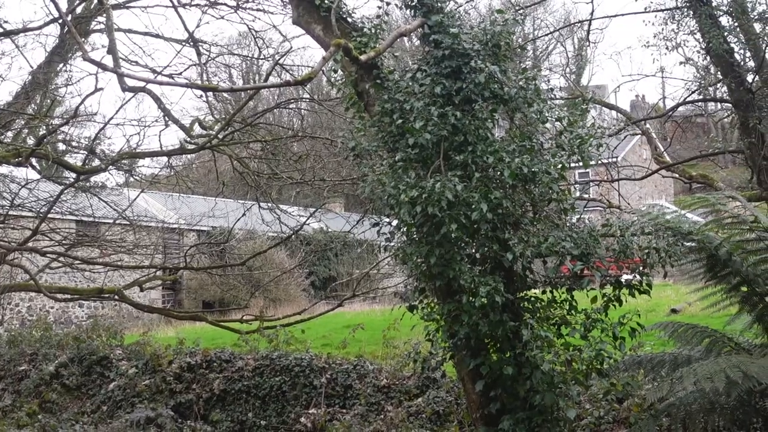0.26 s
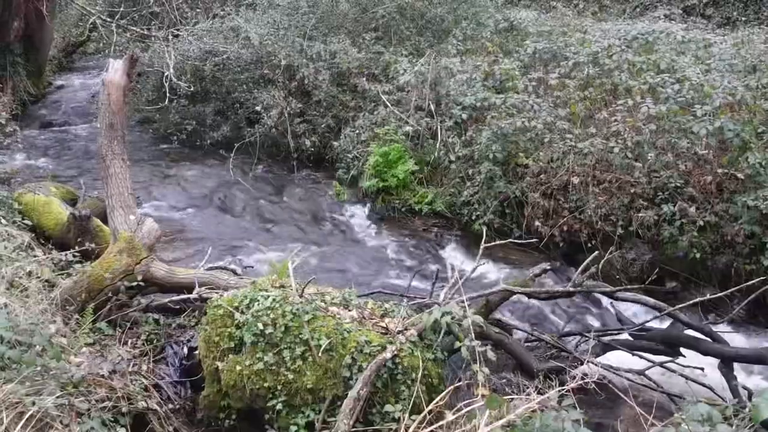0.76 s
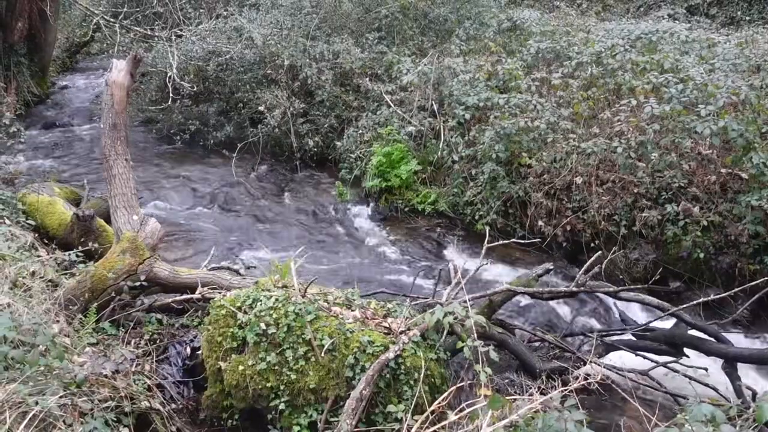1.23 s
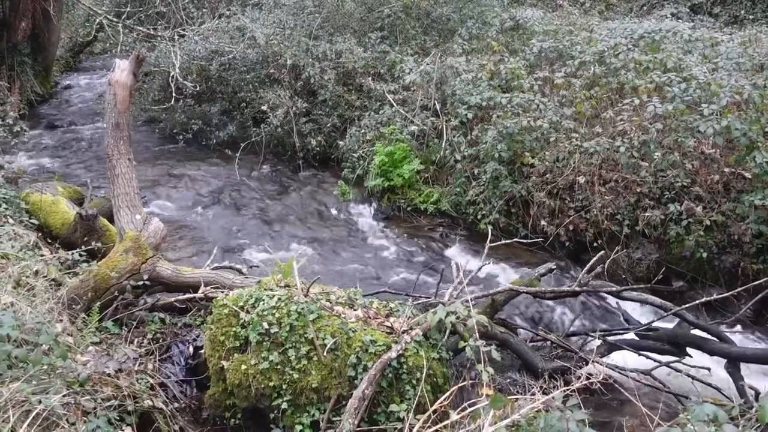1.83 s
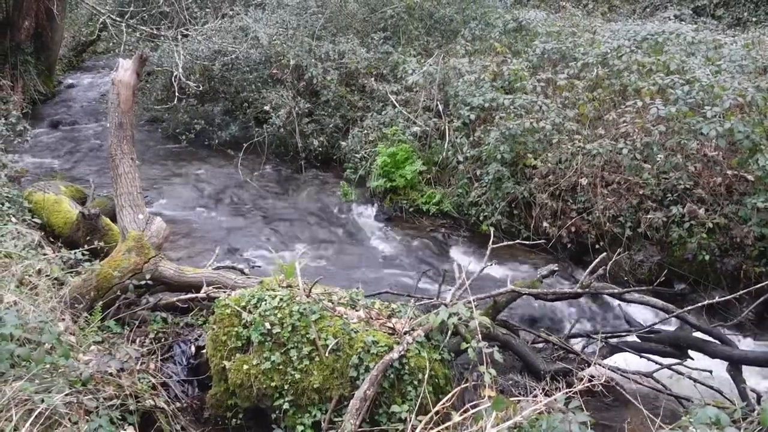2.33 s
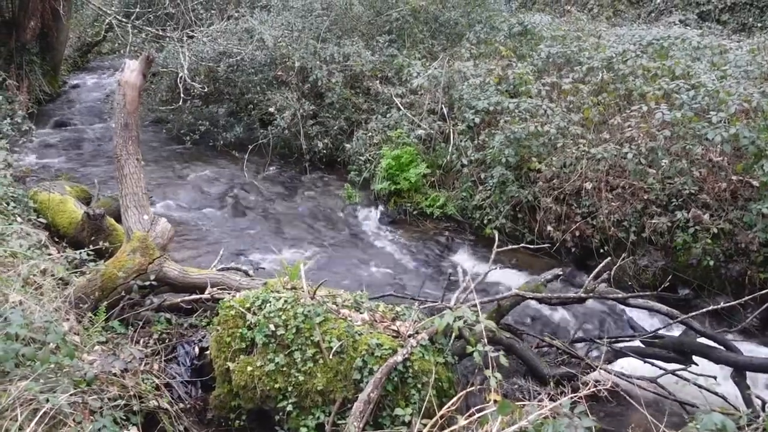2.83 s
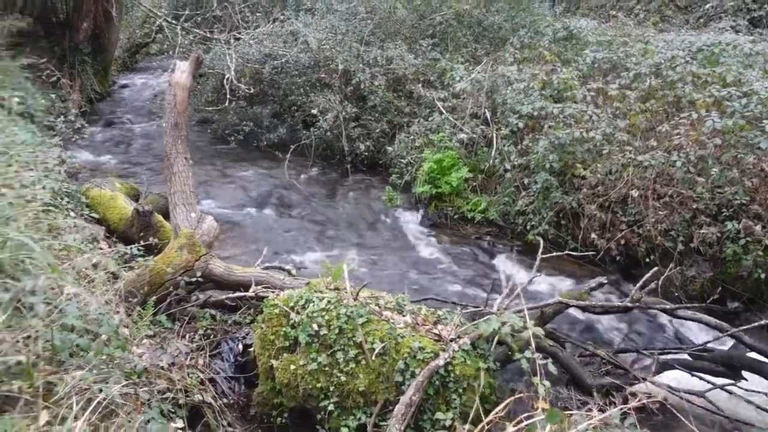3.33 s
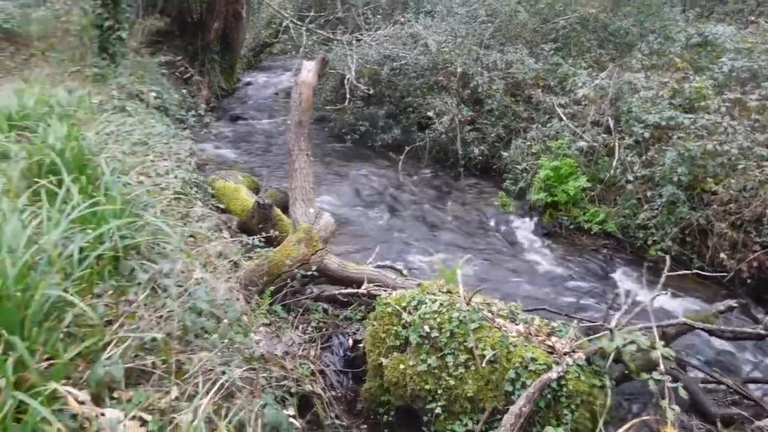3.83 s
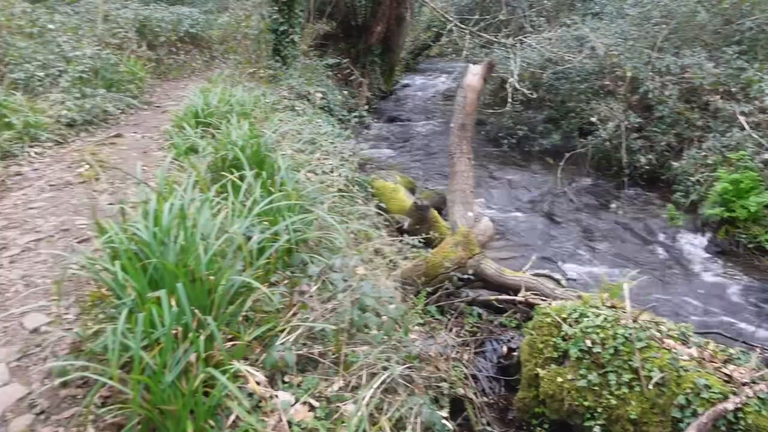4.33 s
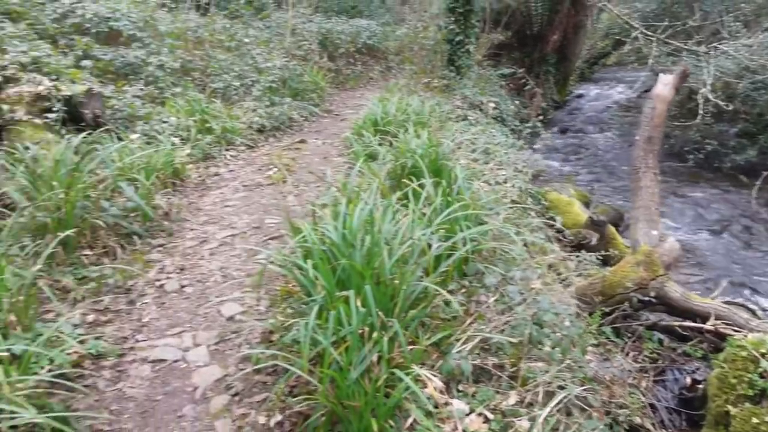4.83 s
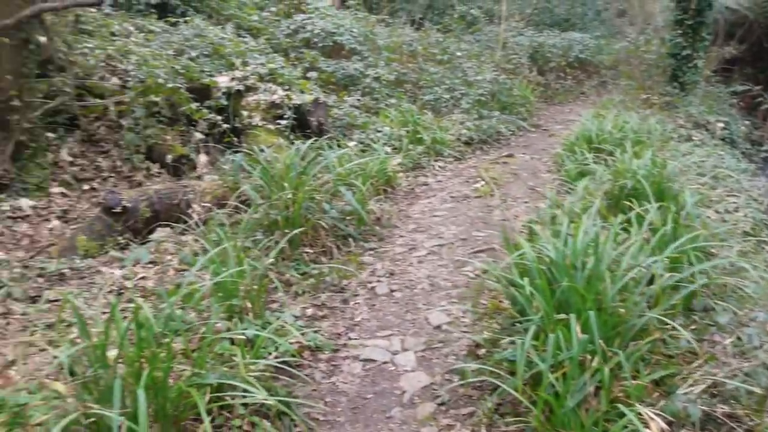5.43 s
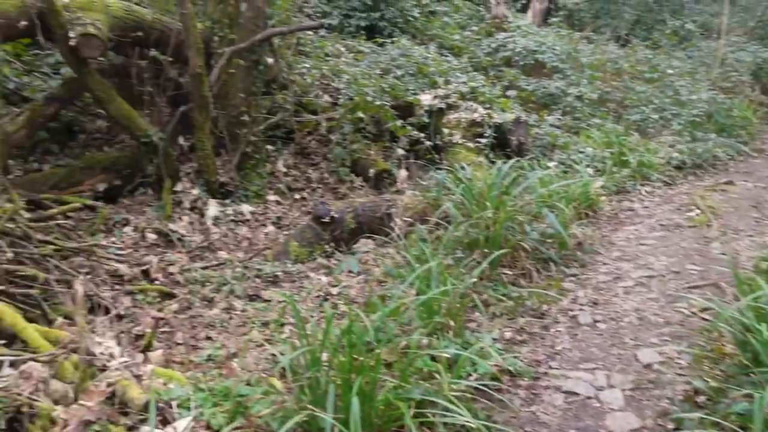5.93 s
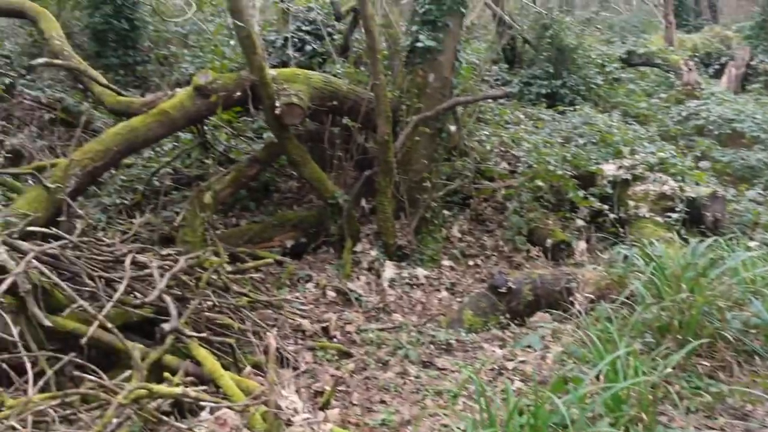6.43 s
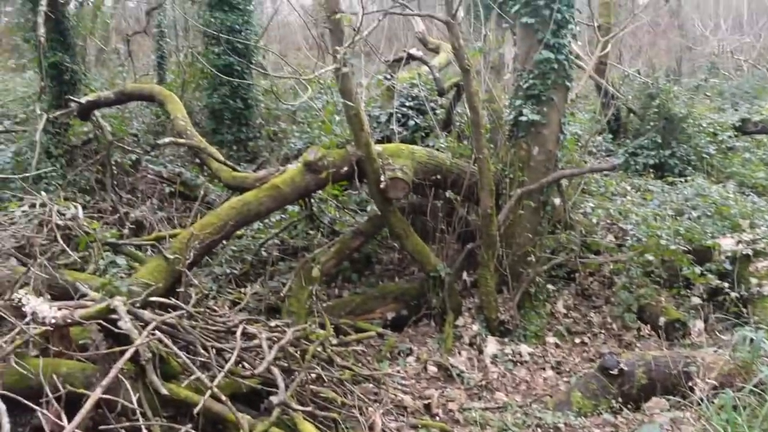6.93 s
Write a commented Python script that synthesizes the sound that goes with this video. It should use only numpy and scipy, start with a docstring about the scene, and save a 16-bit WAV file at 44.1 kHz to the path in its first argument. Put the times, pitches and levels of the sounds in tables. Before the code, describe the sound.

A fast shallow stream rushes over rocks in a wood, a dense hiss with mid-low gurgling and babbling. It starts slightly softer and duller, blinks nearly silent at a cut around half a second, then returns closer and brighter. Small round glugs and droplet ticks stand out. Handheld stereo leaning right; as the microphone turns left, the water grows duller and quieter.

```python
"""A shallow, fast stream over rocks in a wood, heard by a hand-held pair of microphone ports.
First it is heard from a lawn; at 0.53 s a cut with a short fade leads to a pose facing the water.
From 3.13 s the ports turn left, until the stream lies behind the right shoulder.
The rush is bubble swarms in patchy noise, coloured by pose; damped sines make near glugs and droplets.
"""
import sys
import numpy as np
from scipy import signal
from scipy.fft import rfft, irfft, next_fast_len
from scipy.io import wavfile
from scipy.ndimage import uniform_filter1d, map_coordinates

SR = 44100
rng = np.random.default_rng(int(sys.argv[2]) if len(sys.argv) > 2 else 0)


def master(y):
    """Save y as 16-bit WAV."""
    cut = np.clip(np.atleast_2d(y).T, -1, 1)
    pcm = np.round(cut * 32767)  # scale
    wavfile.write(sys.argv[1], SR, pcm.astype(np.int16))


N = 316197
TOP_HZ = 15700  # band limit
FRAME = 2048  # samples
EDIT_S = 0.532  # cut from the lawn to the water


def water():
    """Churn, gurgle, ringing trickles, fizz and sparse spatter surge together over the rocks."""
    gurgle = swarm(count=2500, hz=799.8, spread=0.605, cycles=5.16, scatter_db=7.5, size=1400)
    trickle = swarm(count=2500, hz=3210, spread=0.6, cycles=11, scatter_db=16, size=900)
    fizz = swarm(count=12000, hz=6860, spread=0.507, cycles=2.6, scatter_db=17, size=160)
    spatter = swarm(count=500, hz=6000, spread=0.546, cycles=1.6, scatter_db=14, size=120)
    mix = churn(patchy_db=0.67) + gurgle * amp(-21) + trickle * amp(-19)
    mix = mix + fizz * amp(-11) + spatter * amp(-24)
    surge_db = 0.37 * wobble(9) + 0.26 * wobble(25)
    return amp(surge_db) * mix


def churn(patchy_db):
    """Countless far bubbles merge into noise whose loudness comes in patches of time and pitch."""
    _, _, z = signal.stft(rng.standard_normal(N), nperseg=256)
    field = uniform_filter1d(rng.standard_normal(z.shape), size=8, axis=0)
    field = uniform_filter1d(field, size=10, axis=1)
    return signal.istft(z * amp(patchy_db * field / field.std()), nperseg=256)[1][:N]


def swarm(count, hz, spread, cycles, scatter_db, size):
    """Random bubbles: log-normal pitch, levels spread evenly over a range of dB, unit RMS in all."""
    place, g = rng.random((count, 2)), rng.standard_normal(count)
    pitch_hz = np.clip(hz * np.exp(spread * g), 150, TOP_HZ)
    start_s = place[:, 0] * N / SR
    x = bubbles(start_s, amp(-scatter_db * place[:, 1]), pitch_hz, cycles, 0.059, size)
    return x / x.std()


def bubbles(start_s, gain, hz, cycles, rise, size):
    """Damped sines with a soft start; the pitch rises as each bubble nears the surface."""
    k = np.arange(size)
    turns = k / SR * hz[:, None]
    age = turns / cycles
    envelope = age * np.exp(1 - age) * np.exp(-(k / size * 2) ** 4)
    ring = envelope * np.sin(2 * np.pi * turns * (1 + rise * age / 2))
    at = np.round(start_s * SR).astype(int)[:, None] + k
    return np.bincount(at.ravel(), (gain[:, None] * ring).ravel(), N + size)[:N]


# single bubbles that stand out: (envelope peak time [s], nominal peak level [dB], pitch [Hz])
GLUG_EVENTS = [(.05, -23, 760), (.108, -21, 1000), (.128, -24, 1550), (.162, -25, 1500), (.222, -24, 602),
               (.254, -33, 312), (.318, -24, 1500), (.388, -23, 1050), (.568, -31, 2970), (.59, -24, 839),
               (.794, -30, 2930), (.808, -21, 820), (.959, -20, 807), (.963, -31, 3620), (1.222, -32, 4070),
               (1.435, -25, 1420), (1.455, -21, 830), (1.501, -29, 3510), (1.512, -28, 2600),
               (1.515, -32, 4240), (1.522, -28, 470), (1.527, -19, 650), (1.678, -36, 279),
               (1.756, -30, 3680), (1.766, -18, 839), (1.898, -21, 800), (2.008, -24, 3100),
               (2.034, -22, 775), (2.594, -29, 2520), (2.686, -23, 710), (2.857, -27, 1700),
               (2.888, -30, 3660), (2.929, -21, 710), (2.968, -29, 2390), (3.156, -29, 3270),
               (3.249, -25, 1750), (3.257, -33, 366), (3.274, -23, 860), (3.29, -25, 1400),
               (3.305, -26, 1550), (3.408, -27, 1790), (3.507, -23, 710), (3.557, -21, 699),
               (3.62, -22, 760), (3.668, -21, 800), (3.69, -21, 760), (3.708, -22, 656), (3.724, -21, 690),
               (3.869, -30, 3790), (3.885, -26, 1900), (3.909, -24, 1920), (3.952, -25, 1950),
               (4.104, -24, 1700), (4.12, -21, 775), (4.178, -23, 1540), (4.217, -22, 915),
               (4.296, -35, 290), (4.425, -25, 1750), (4.44, -26, 1800), (4.497, -32, 3660),
               (4.515, -23, 1500), (4.538, -24, 1100), (4.719, -24, 1700), (4.877, -24, 839),
               (4.885, -27, 3550), (4.918, -28, 2300), (4.943, -26, 600), (5.148, -29, 2390),
               (5.154, -24, 860), (5.516, -33, 4370), (5.574, -23, 925), (5.596, -29, 325),
               (5.606, -33, 4760), (6.036, -25, 1140), (6.084, -25, 880), (6.132, -24, 1335),
               (6.143, -35, 366), (6.194, -26, 670), (6.214, -25, 1440), (6.249, -27, 600),
               (6.275, -27, 600), (6.292, -24, 1250), (6.567, -25, 900), (6.612, -31, 2300),
               (6.646, -27, 2930), (6.734, -25, 839), (6.917, -34, 409), (6.936, -23, 882),
               (6.986, -27, 1065), (7.046, -29, 1184)]


def glugs():
    """Single near bubbles; the higher the pitch, the more cycles until the envelope peaks and decays."""
    peak_s, db, hz = np.transpose(GLUG_EVENTS)
    cycles = 3.8 * (hz / 700) ** 0.7
    return bubbles(peak_s - cycles / hz, amp(db), hz, cycles[:, None], rise=0.012, size=4000)


# near droplets: (time [s], nominal peak level of each bubble [dB], centre pitch [Hz], pitch spread [octaves])
DROPLET_EVENTS = [(.162, -30, 7000, 0.35), (.375, -39, 11000, .3), (.567, -31, 4500, .8),
                  (1.025, -30, 4200, 0.47), (1.142, -27, 7400, .35), (1.431, -30, 3300, 0.37),
                  (1.514, -25, 3600, 0.44), (1.536, -41, 10000, .3), (1.917, -30, 6940, 0.23),
                  (2.008, -30, 3300, .4), (3.152, -27, 3400, .4), (3.658, -32, 8500, .35),
                  (3.715, -35, 6300, .3), (3.898, -39, 10000, .3), (4.073, -30, 6300, .3),
                  (4.65, -32, 3600, 0.36), (4.7135, -27, 8200, 0.23), (4.9215, -33, 11800, .3),
                  (5.312, -44, 10000, .3), (5.445, -38, 6300, .3), (5.521, -45, 10000, .3),
                  (5.547, -45, 10000, .3), (5.826, -30, 4700, .6), (6.008, -28, 3600, .4),
                  (6.452, -46, 10000, .3), (6.477, -34, 3600, .4), (6.644, -33, 4200, 0.63),
                  (6.781, -34, 4700, 0.55), (6.871, -45, 10000, .3)]


def droplets():
    """Droplets and small splashes: each bursts into six tiny bubbles within 2.2 ms."""
    start_s, db, hz, octaves = np.repeat(DROPLET_EVENTS, 6, axis=0).T
    late_s = 0.0022 * rng.random(start_s.shape)
    detune = np.tile(np.linspace(-1, 1, 6), len(DROPLET_EVENTS))
    detune = detune + rng.uniform(-0.2, 0.2, start_s.shape)
    return bubbles(start_s + late_s, amp(db), hz * 2 ** (octaves * detune), cycles=3, rise=0.01, size=400)


# slow swells of the whole rush: (time [s], level [dB])
RUSH_SURGE = [(0, 2), (.3, 1.5), (.7, 0.1), (1.3, 0.44), (2, 0.56), (2.6, 0.5), (3.1, 0.3), (3.7, 0.4),
              (4.5, -0.5), (5, 0.5), (5.45, 0), (5.85, -0.5), (6.15, -0.5), (6.45, -1.7), (6.7, -1.5),
              (7.17, -1.3)]
# level of the low gurgling band at its centre: (time [s], level [dB])
GURGLE_LEVEL = [(0, -0.5), (.4, -2.5), (.7, -.8), (1.1, -0.9), (1.6, -0.2), (1.95, -0.5), (2.35, -.3),
                (2.6, -1), (2.9, -1.5), (3.3, -1), (3.5, -1), (3.7, 0), (3.9, -0.7), (4.3, 1), (4.6, -0.5),
                (4.9, 1.5), (5.4, 0), (5.8, 0.5), (6.2, 1), (6.6, 2.5), (7.17, 3)]
# level of the brighter babbling band at its centre: (time [s], level [dB])
BABBLE_LEVEL = [(0, 1.5), (.2, 1.5), (.45, 3), (.8, -1), (1.2, 1.5), (1.6, -0.5), (2, 1), (2.5, 1), (3, 0),
                (3.3, -0.5), (3.6, 0.5), (3.9, 0), (4.2, -0.5), (4.48, 1.2), (4.7, -1), (5, 0), (5.5, -0.5),
                (5.8, 0), (6.1, 0.5), (6.3, .8), (6.6, .5), (7.17, -0.5)]


def flow_swells(hz, t):
    """Gain as the whole rush, its gurgling band and its babbling band swell and ebb."""
    def band_db(rows, centre_hz, half_width_octaves):
        offset = np.log2(hz / centre_hz + 1e-9) / half_width_octaves
        return np.outer(np.exp(-offset ** 2), np.interp(t, *np.transpose(rows)))

    surge_db = np.interp(t, *np.transpose(RUSH_SURGE))
    return amp(surge_db + band_db(GURGLE_LEVEL, 725, 0.47) + band_db(BABBLE_LEVEL, 1530, 0.48))


# rush spectra at the right port, before treble tilt and level scaling: (frequency [Hz], relative density [dB])
LAWN_COLOUR = [(60, -51), (120, -44), (180, -29), (280, -14.5), (450, -13), (620, -5), (810, 0), (980, -1),
               (1190, -7.5), (1490, -7.5), (2200, -10), (2800, -13), (3500, -14), (4800, -18.5),
               (6500, -24), (9000, -31), (12000, -36.5), (15000, -48)]
FACING_COLOUR = [(60, -51), (120, -40.5), (180, -27), (280, -12), (450, -11.5), (560, -4), (700, 1.5),
                 (830, 2), (990, -0.5), (1150, -4.5), (1450, -3.5), (2200, -8), (3400, -8.5), (4800, -14),
                 (6500, -18.5), (9000, -22.5), (12000, -29), (15000, -39.5)]
HALF_TURN_COLOUR = [(60, -51), (120, -42), (180, -29.5), (280, -12), (450, -10), (560, -8), (700, -2.5),
                    (830, -0.5), (990, -2), (1150, -4.5), (1450, -3.5), (2200, -8), (3400, -9.5),
                    (4800, -15.5), (6500, -20.5), (9000, -24.5), (12000, -28.5), (15000, -37)]
AWAY_COLOUR = [(60, -51), (120, -48), (180, -32.5), (280, -17.5), (450, -9.5), (620, -8.5), (810, -6),
               (1150, -6.5), (1450, -7), (2200, -9.5), (3400, -12.5), (4800, -17.5), (6500, -24.5),
               (9000, -27), (12000, -29), (15000, -43)]
COLOUR_DEG = (0, 42, 78)  # facing, half turn, away
LAWN_DB, FACING_DB = -27.5, -25  # nominal levels before swells
BEHIND_DB, BEHIND_POWER = -3, 3  # level change at 120 degrees; power of the angle
SPRAY_DB_PER_OCTAVE, DULL_DB_PER_OCTAVE = -3.5, -9  # treble tilt after the cut
DULL_DEG, DULL_WIDTH_DEG = 45, 7  # angle where the treble dulls


def flow_colour(hz, t):
    """Spectrum and level of the rush by pose; it sinks and the treble grows duller during the turn."""
    dull = (1 + np.tanh((swing(t) - DULL_DEG) / DULL_WIDTH_DEG)) / 2
    tilt = SPRAY_DB_PER_OCTAVE + dull * (DULL_DB_PER_OCTAVE - SPRAY_DB_PER_OCTAVE)
    octaves_up = np.clip(np.log2(hz / 7500 + 1e-9), 0, 1.5)
    spray_db = np.outer(octaves_up, tilt * (t > EDIT_S))
    tables = (LAWN_COLOUR, FACING_COLOUR, HALF_TURN_COLOUR, AWAY_COLOUR)
    colour = amp(pose(tables, COLOUR_DEG, hz, t)[0] + spray_db)
    turned_db = FACING_DB + BEHIND_DB * (swing(t) / 120) ** BEHIND_POWER
    level = amp(np.where(t < EDIT_S, LAWN_DB, turned_db))
    return colour / np.sqrt(np.sum(colour ** 2, axis=0)) * level


# port pair by pose: (frequency [Hz], left minus right [dB], left-right likeness [0-1], left lead [rad])
LAWN_PAIR = [(40, -0.4, 0.96, 0), (180, -2.5, 0.97, -0.27), (900, -3.9, 0.95, -0.45),
             (2200, -2.4, 0.85, -0.43), (4800, -2.9, 0.71, 0), (6500, -1.2, 0.65, 0.17), (9000, 0, 0.89, 0),
             (15000, 0, 0.98, 0)]
FACING_PAIR = [(40, -0.4, 0.96, 0), (180, -2.1, 0.98, -0.25), (450, -4.6, 0.97, -0.22),
               (1150, -6.1, 0.96, -0.03), (3400, -5.3, 0.97, 0), (4800, -6.4, 0.84, -0.07),
               (6500, -5.5, 0.65, 0.35), (9000, -3.7, 0.62, 0.52), (12000, -1.1, 0.84, 0.15),
               (15000, 0, 1, 0)]
HALF_TURN_PAIR = [(40, -0.4, 0.96, 0), (450, -5, 0.97, -0.2), (800, -7.1, 0.97, -0.05),
                  (1300, -8.8, 0.92, 0.1), (2000, -8.1, 0.86, 0.35), (3200, -9.1, 0.8, 0.3),
                  (4700, -9.7, 0.63, 0.4), (6500, -8.9, 0.38, 0.6), (9000, -7, 0.48, 1.1),
                  (12000, -3.8, 0.35, 0.8), (15000, -0.2, 0.5, 1)]
SIDE_PAIR = [(40, -0.4, 0.96, 0), (450, -5.3, 0.98, -0.2), (800, -8.4, 0.95, 0.1), (1300, -8.7, 0.88, 0.35),
             (2000, -8.4, 0.84, 0.55), (3200, -11.8, 0.68, 0.55), (4700, -12.8, 0.38, 0.6),
             (6500, -9.2, 0.22, 2.6), (9000, -7.8, 0.24, 1.8), (12000, -3.6, 0.25, 2.9),
             (15000, -0.2, 0.2, 3)]
AWAY_PAIR = [(40, -0.4, 0.96, 0), (180, -2.9, 0.97, -0.17), (450, -5.3, 0.98, -0.18),
             (810, -9.6, 0.94, 0.05), (1150, -7.5, 0.85, 0.45), (2200, -7.4, 0.83, 0.55),
             (3400, -12.2, 0.52, 0.3), (4800, -10.2, 0.05, 2.57), (6500, -7.4, 0.32, 2.75),
             (9000, -9.1, 0.1, 2.41), (12000, -3.4, 0.4, 3.3), (15000, -0.2, 0.08, 3.2)]
PAIR_DEG = (0, 42, 70, 100)  # facing, half turn, side, away


def left_port(right, banks, hz, t):
    """The left port hears the right's sound shaded by the body, mixed with sound from the banks."""
    tables = (LAWN_PAIR, FACING_PAIR, HALF_TURN_PAIR, SIDE_PAIR, AWAY_PAIR)
    balance_db, alike, lead_rad = pose(tables, PAIR_DEG, hz, t)
    shared = alike * np.exp(1j * lead_rad) * right
    return amp(balance_db) * (shared + np.sqrt(1 - alike ** 2) * banks)


def pose(tables, degrees, hz, t):
    """Table columns for every Hz and moment: the lawn's, then those of the angles blended by the turn."""
    def read(rows):
        row_hz, *columns = np.transpose(rows)
        return np.array([np.interp(np.log(hz + 1), np.log(row_hz + 1), c) for c in columns])[..., None]

    lawn, *turned = map(read, tables)
    shares = [np.interp(swing(t), degrees, one) for one in np.eye(len(degrees))]
    blend = sum(table * share for table, share in zip(turned, shares))
    return np.where(t < EDIT_S, lawn, blend)


SWING_S, SWING_DEG_PER_S = 3.13, 27.4  # start and rate of the left turn


def swing(t):
    """Angle in degrees turned away from the stream."""
    return SWING_DEG_PER_S * np.clip(t - SWING_S, 0, None)


def amp(db):
    """Gain of a level in dB."""
    return 10 ** (np.asarray(db) / 20)


def wobble(rate):
    """A smooth random curve with rate knots a second."""
    knots = rng.standard_normal(int(N * rate / SR) + 4)
    return map_coordinates(knots, [np.arange(N) * rate / SR])


def frames(x):
    """Short-time spectra with their Hz and s axes."""
    return signal.stft(x, SR, nperseg=FRAME, noverlap=FRAME * 3 // 4)


def flat(z):
    """Short-time spectra scaled to an even long-term spectrum."""
    power = uniform_filter1d(np.mean(np.abs(z) ** 2, axis=1), size=15)
    return z / np.sqrt(power)[:, None]


def scene():
    """The right port hears the stream and near bubbles; the left follows, with the banks mixed in."""
    hz, t, direct = frames(water())
    banks = frames(water())[2]
    colour = flow_colour(hz, t) * flow_swells(hz, t)
    near = frames(glugs() + droplets())[2]
    right = flat(direct) * colour + near
    left = left_port(right, flat(banks) * colour, hz, t)
    return signal.istft(np.array([left, right]), SR, nperseg=FRAME, noverlap=FRAME * 3 // 4)[1][:, :N]


FADE_OUT_S, FADE_IN_S, FADE_DB = 0.034, 0.021, -31  # FADE_DB: gain at the cut


def record(dry):
    """Fade out and in at the cut, roll off rumble below 45 Hz and stop all above the band limit."""
    t = np.arange(N) / SR - EDIT_S
    fade_out = np.clip(-t / FADE_OUT_S, amp(FADE_DB), 1)
    fade_in = amp(FADE_DB * np.clip(1 - t / FADE_IN_S, 0, 1))
    faded = dry * np.where(t < 0, fade_out, fade_in)
    m = next_fast_len(N)
    hz = np.fft.rfftfreq(m, 1 / SR)
    response = (hz < TOP_HZ) * hz / np.hypot(hz, 45)
    return irfft(rfft(faded, m) * response, m)[:, :N]


dry = scene()
out = record(dry)
master(out)
```